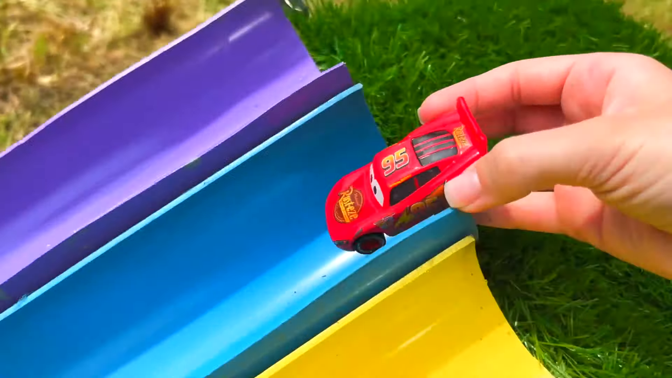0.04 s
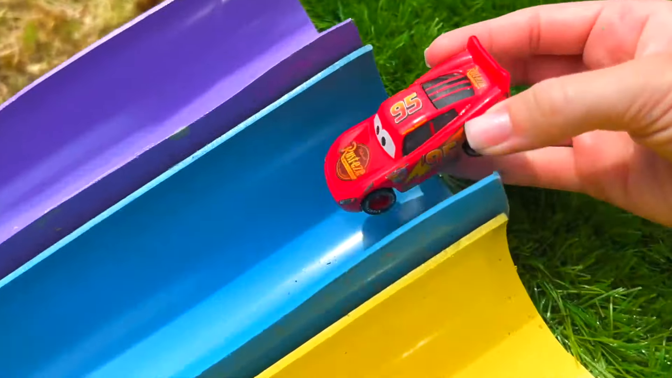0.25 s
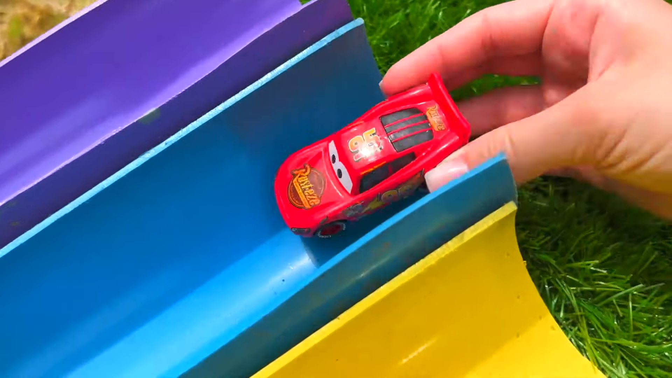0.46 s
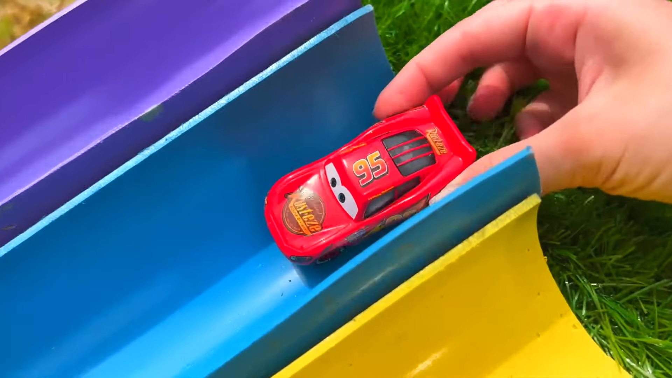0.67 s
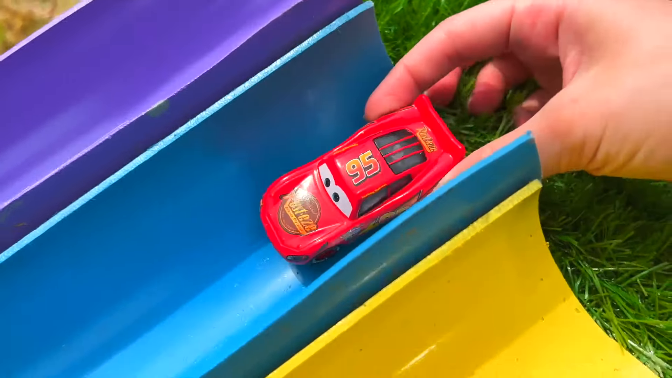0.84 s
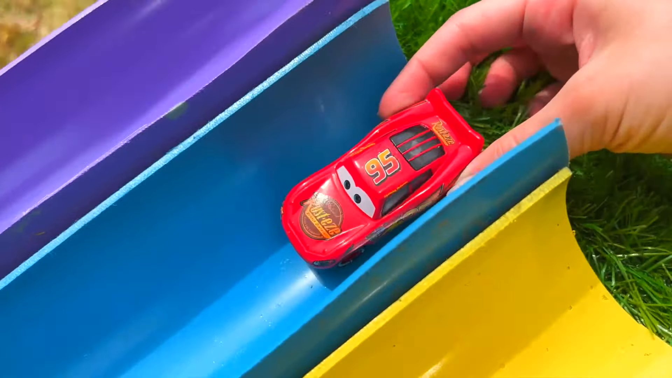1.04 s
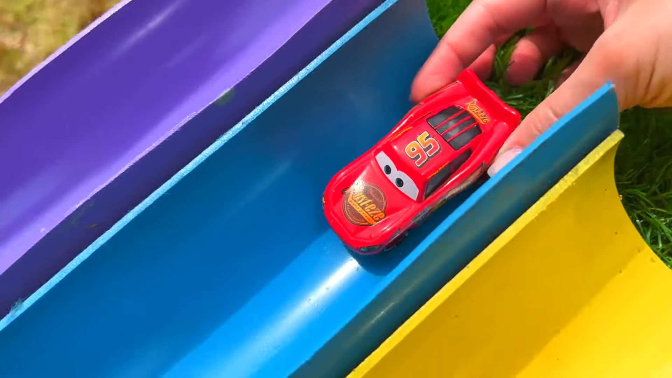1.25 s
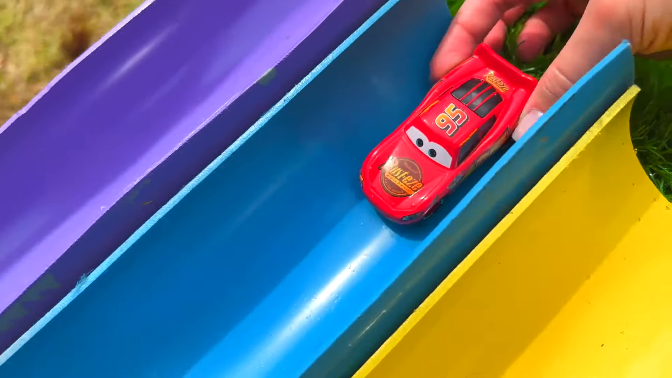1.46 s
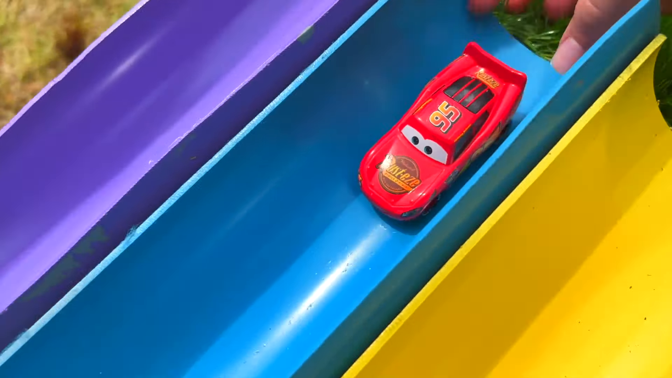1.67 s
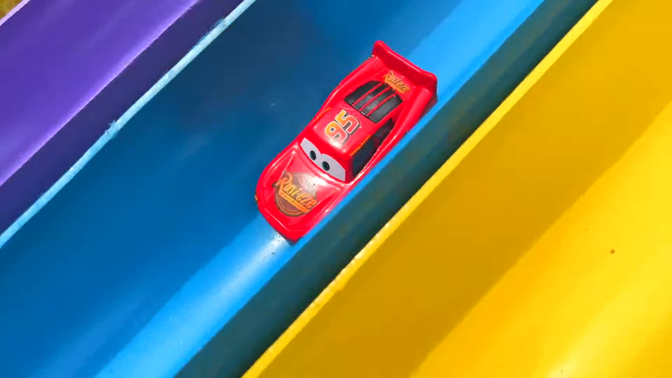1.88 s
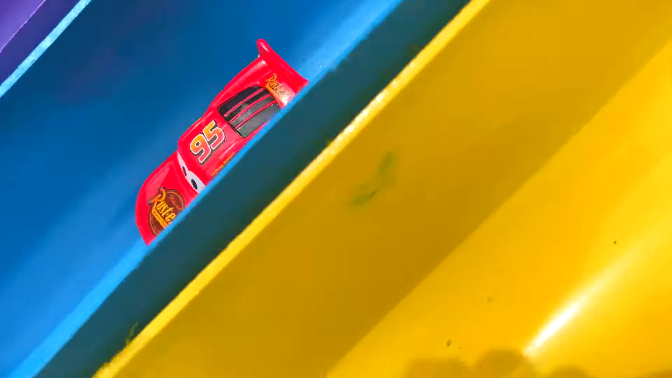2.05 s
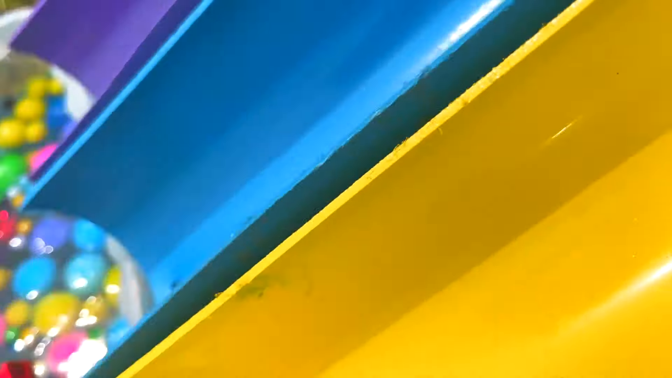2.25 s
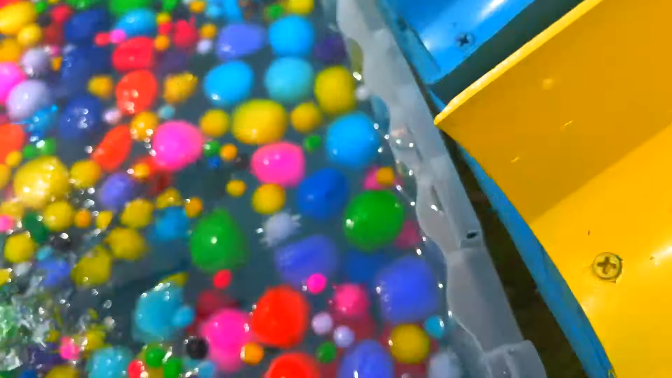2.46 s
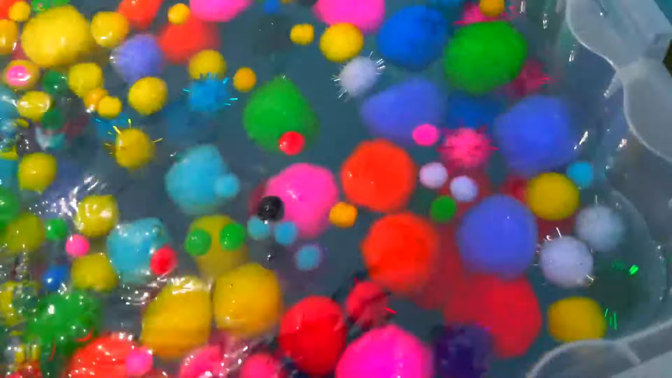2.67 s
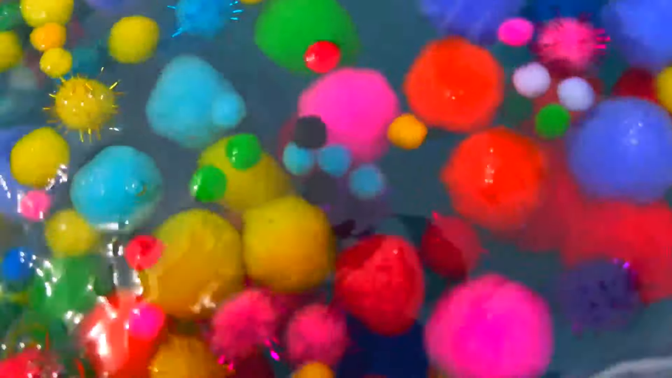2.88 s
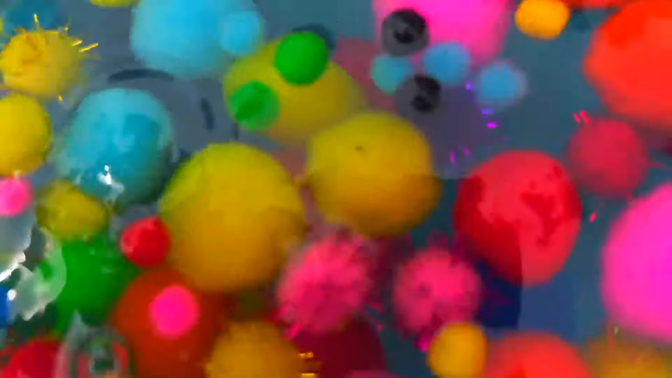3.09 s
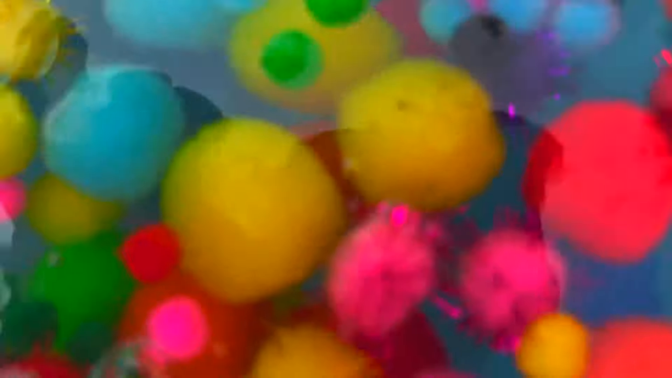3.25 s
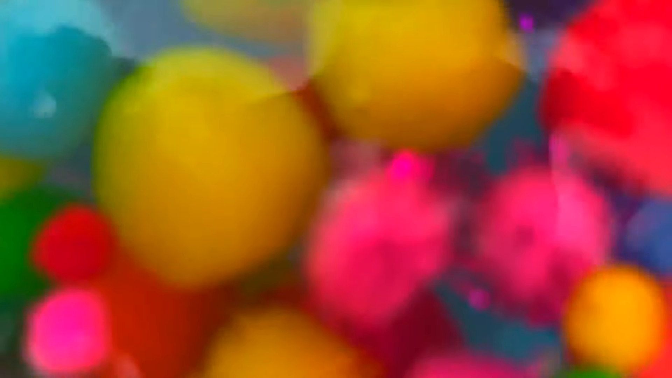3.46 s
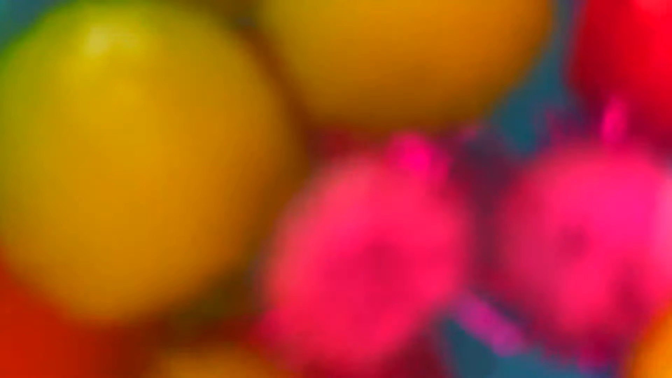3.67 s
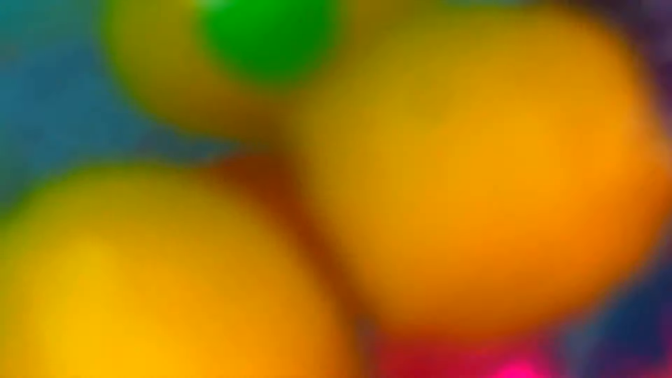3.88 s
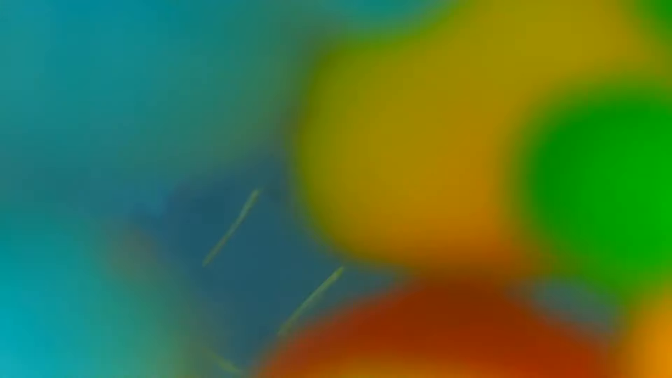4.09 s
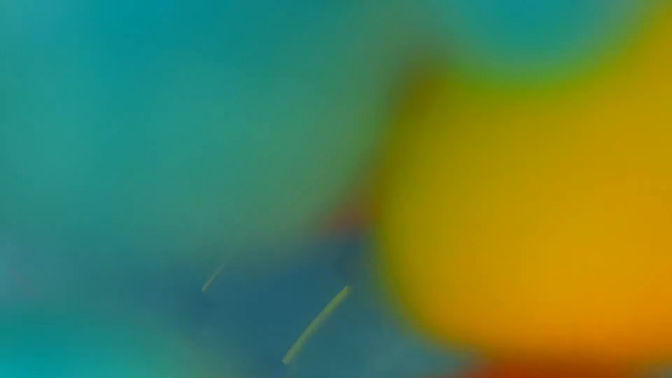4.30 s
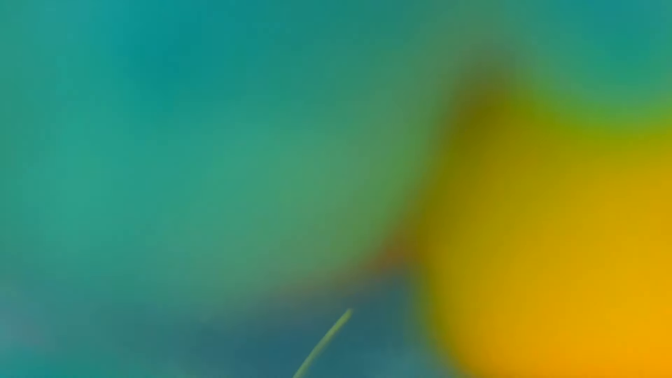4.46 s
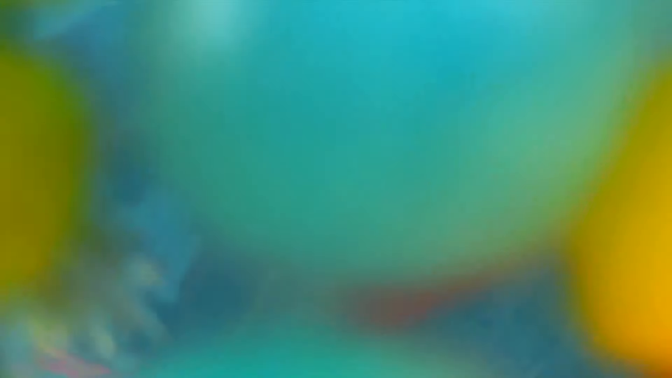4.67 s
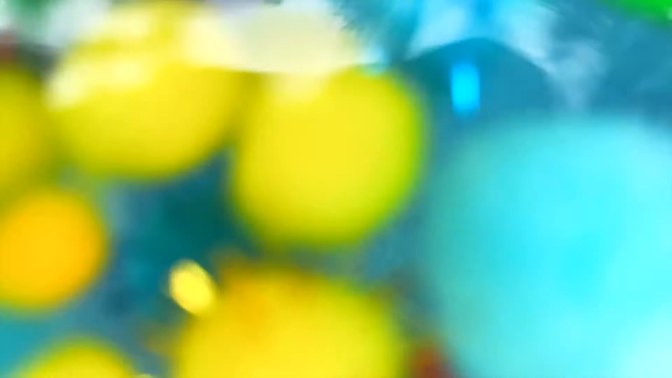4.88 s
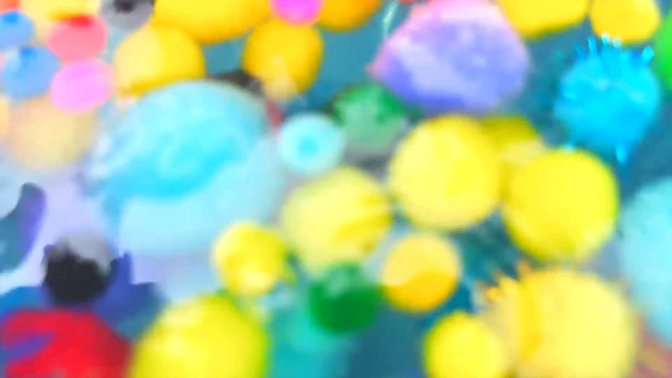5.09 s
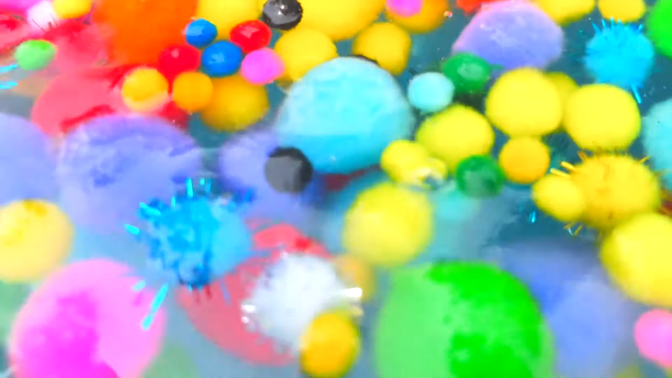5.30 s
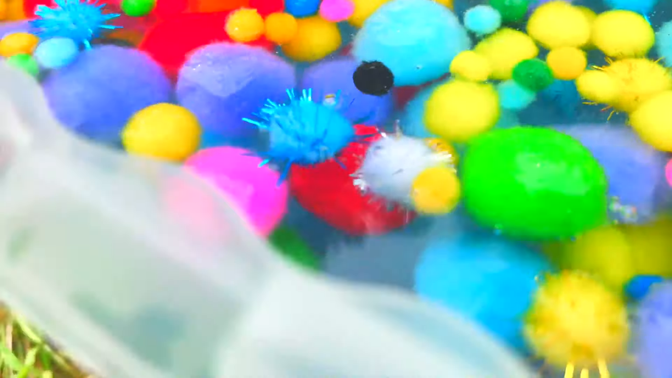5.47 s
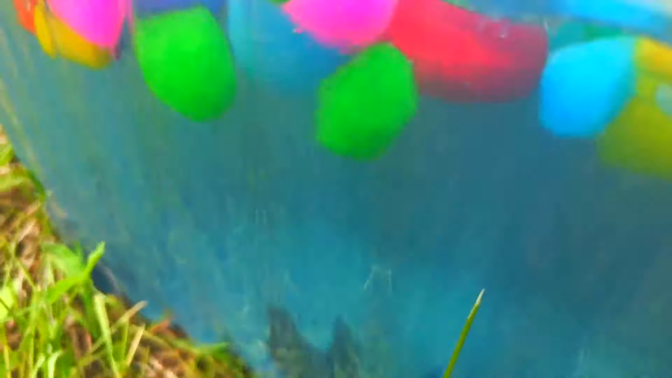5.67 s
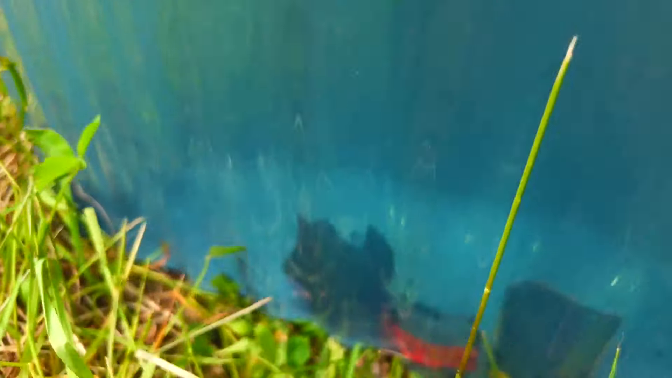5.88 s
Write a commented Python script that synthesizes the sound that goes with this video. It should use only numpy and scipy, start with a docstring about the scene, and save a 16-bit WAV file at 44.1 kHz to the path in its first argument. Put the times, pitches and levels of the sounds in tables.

```python
"""Outdoors, by a plastic gutter that slopes into a tub of water, with a stereo microphone close by.
A hand sets a toy car on the gutter, knocking its modes into a ring; hard wheels chatter down it, louder
with speed. The car splashes in, punching a hole whose notes fall as it deepens. Bubbles glug, the tub
sloshes and foam crackles as its cells burst. Then someone shifts beside the microphone with thuds,
scuffs and dry snaps."""
import sys
import numpy as np
from scipy import signal
from scipy.fft import rfft, irfft
from scipy.io import wavfile
from scipy.ndimage import uniform_filter1d

SR = 44100
rng = np.random.default_rng(int(sys.argv[2]) if len(sys.argv) > 2 else 0)


def master_out(mix):
    """Clip the mix to full scale and print it as 16-bit PCM to the path in sys.argv[1]."""
    frames = np.transpose(np.atleast_2d(mix))
    ceiling = np.clip(frames, -1, 1)
    pcm = np.round(ceiling * 32767).astype(np.int16)
    wavfile.write(sys.argv[1], SR, pcm)


N = 261954

# The gutter's modes. Each row: pitch in Hz, level in dB, t60 in seconds.
GUTTER_MODES = [(623, -9.5, 0.15), (1100, -9, 0.1), (1286, 4, 0.046), (1745, 4.5, 0.024), (1830, 3, 0.031),
                (2237, 10.5, 0.0093), (2850, 6.5, 0.015), (3512, 3.5, 0.016), (4080, 0, 0.028)]
# Colour of wheel chatter and spray treble. Each row: frequency in Hz, level in dB.
CHATTER_TONE = [(180, -53.5), (300, -5), (607, -3), (730, -31), (1250, -5), (1480, -1), (2170, 5.5),
                (2570, 0), (7380, -14.5), (8870, -7.5), (10500, -17), (11600, -15), (15700, -13.5),
                (16500, -50.5)]
LAG_GUTTER, LAG_TUB, LAG_BESIDE = -4, 6, 39  # samples by which the right channel hears each place late


def amp(db):
    return 10 ** (np.asarray(db) / 20)


def unit_rms(x):
    return x / np.sqrt(np.mean(x ** 2) + 1e-20)


def curves(rows):
    """Columns of a time table at every sample."""
    s, *columns = np.transpose(rows)
    return [np.interp(np.arange(N) / SR, s, c) for c in columns]


def level(rows):
    """Gain from rows of seconds and dB, fading to silence at both ends."""
    t = np.arange(N) / SR
    return amp(curves(rows)[0]) * np.clip(np.minimum(t - rows[0][0], rows[-1][0] - t) / .01, 0, 1)


def spells(rows):
    """Gain of spells that rise, hold and fall."""
    t, gain = np.arange(N) / SR, np.zeros(N)
    for s, rise, hold, fall, db in rows:
        up = np.clip(np.minimum((t - s) / rise, (s + rise + hold + fall - t) / fall), 0, 1)
        gain += amp(db - 12.5 * (1 - up)) * np.minimum(up / .3, 1)
    return gain


def on_bins(points):
    hz, value = np.transpose(points)
    return np.interp(np.log(np.fft.rfftfreq(N, 1 / SR) + 1), np.log(hz + 1), value)


def coloured(x, tone):
    return unit_rms(irfft(rfft(x) * amp(on_bins(tone)), N))


def band(x, lo_hz, hi_hz):
    return signal.sosfilt(signal.butter(2, [lo_hz, min(hi_hz, .45 * SR)], "band", fs=SR, output="sos"), x)


def noise(lo_hz, hi_hz):
    return unit_rms(band(rng.standard_normal(N), lo_hz, hi_hz))


def grit(per_s, spread_db, bed):
    """Sparse clicks of uneven size over a bed of noise."""
    size = amp(spread_db * np.minimum(rng.exponential(1, N), 5)) * rng.choice([-1., 1.], N)
    return unit_rms(size * (rng.random(N) < per_s / SR)) + bed * rng.standard_normal(N)


def grains(per_s, spread_db, hz, octaves, cycles):
    """Short rings at 14 pitches around hz, each set off by its own sparse clicks."""
    out = np.zeros(N)
    for f in hz * 2 ** (octaves * np.linspace(-1, 1, 14)):
        t = np.arange(0, 3 * cycles / f, 1 / SR)
        size = amp(spread_db * np.minimum(rng.exponential(1, N), 4))
        clicks = size * (rng.random(N) < per_s / 14 / SR)
        ring = np.sin(2 * np.pi * f * t) * t * np.exp(-2 * t * f / cycles) * f ** 1.8
        out += signal.oaconvolve(clicks, ring)[:N]
    return unit_rms(out)


def crack(lo_hz, hi_hz, t60):
    """A short burst of noise between steep band edges."""
    t = np.arange(2000) / SR
    burst = rng.standard_normal(2000) * amp(-60 * t / t60) * (1 - np.exp(-t / 0.00065))
    burst = band(band(burst, lo_hz, hi_hz), 0.7 * lo_hz, 1.3 * hi_hz)
    return burst / np.max(abs(burst))


def place(mix, s, db, pan_db, sound, lag):
    """Adds a sound at peak level db; pan is left over right, and the right is lag samples late."""
    sound = amp(db) * sound / np.max(abs(sound))
    for side, sign in enumerate((.5, -.5)):
        part = mix[side, round(s * SR) + side * round(lag):][:len(sound)]
        part += amp(sign * pan_db) * sound[:len(part)]


def stereo_pair(x, other):
    """The left channel hears x; the right, a phase-turned copy mixed with unrelated sound."""
    # Each row: frequency in Hz, likeness of the channels from 0 to 1.
    likeness = [(100, 0.92), (600, 0.95), (1400, 0.82), (3000, 0.45), (8000, 1), (15000, 1)]
    # Each row: frequency in Hz, pan in dB.
    balance = [(60, 1), (180, -2.5), (550, -4), (1650, 3.5), (4970, 0.5), (15000, -1.5)]
    # Each row: frequency in Hz, phase lead of the left in radians.
    phase_lead = [(0, -0.5), (1290, 0.62), (4220, -1.7), (4740, -1.1), (5680, -5.5), (7320, -4.5),
                  (8010, -8), (12800, 1.5), (13600, -9.5), (14400, 3), (16700, 24)]
    same, tilt = np.clip(on_bins(likeness), 0, 1), amp(on_bins(balance) / 2)
    right = same * rfft(x) * np.exp(-1j * on_bins(phase_lead)) + np.sqrt(1 - same ** 2) * rfft(other)
    return np.array([irfft(rfft(x) * tilt, N), irfft(right / tilt, N)])


def air():
    """Quiet outdoor hush with faint rustles, unrelated in the two channels."""
    # Each row: frequency in Hz, level in dB.
    hush_tone = [(15, -42), (33, -14), (46, 4.5), (70, -2.5), (124, -25.5), (445, -16), (496, -24),
                 (1640, -24.5), (1980, -28.5), (5720, -30.5), (15200, -53.5), (16500, -66.5)]
    swell = amp(1.1 * noise(1.4, 9.2))
    hush = np.array([coloured(grit(190, 1.8, 1.5), hush_tone) for _ in range(2)])
    return amp(-61) * swell * hush


def rumble():
    """Low lumpy shaking from hand, wheels, slosh and shifting, nearly alike in both channels."""
    # Each row: frequency in Hz, level in dB.
    rumble_tone = [(15, -54), (33, -32.5), (48, 7), (81, 4), (230, 0.5), (609, -13.5), (697, -16.5),
                   (900, -26.5), (1170, -26.5), (1980, -120)]
    # Each row: start, rise, hold and fall in seconds, level in dB.
    shakes = [(0.12, 0.062, 0.61, 0.26, -55.5), (1.53, 0.4, 0.24, 0.088, -37),
              (2.2, 0.025, 0.59, 0.14, -48), (3.9, 0.27, 0.25, 0.37, -62.5)]
    mid, side = (coloured(grit(90, 1.8, 0.66), rumble_tone) for _ in range(2))
    return (amp(-65.5) + spells(shakes)) * np.array([mid + 0.25 * side, mid - 0.25 * side])


def friction(strokes, tone, per_s, bed, lag, width, pan_db):
    """Soft rubbing: dense tiny clicks that swell with each stroke."""
    mid, side = (coloured(grit(per_s, 3.4, bed), tone) for _ in range(2))
    pair = np.array([mid + width * side, np.roll(mid - width * side, lag)])
    return spells(strokes) * pair * amp([[pan_db / 2], [-pan_db / 2]])


def scuffs():
    """Someone brushes past, just left of the microphone."""
    # Each row: start, rise, hold and fall in seconds, level in dB.
    strokes = [(4.16, 0.064, 0.066, 0.036, -53.5), (4.34, 0.058, 0.027, 0.16, -54.5),
               (4.58, 0.11, 0.0038, 0.068, -54), (4.83, 0.048, .08, .04, -66.5),
               (5.03, 0.066, 0.049, 0.038, -74)]
    # Each row: frequency in Hz, level in dB.
    scuff_tone = [(290, -42), (500, 0.5), (959, 0), (1500, 0.5), (1850, 8), (2250, 4), (2650, -1.5),
                  (4200, -17.5), (4800, -4), (5300, -14), (5800, -5), (6650, -10), (7400, -10), (9960, -35),
                  (15600, -53)]
    return friction(strokes, scuff_tone, per_s=3000, bed=1.0, lag=LAG_BESIDE, width=.35, pan_db=2.5)


def scrapes():
    """Tyres and fingers slide on the plastic."""
    # Each row: start, rise, hold and fall in seconds, level in dB.
    strokes = [(0.15, 0.016, 0.24, 0.12, -66.5), (.44, 0.018, 0.051, 0.025, -70),
               (.53, 0.032, 0.028, 0.1, -54.5), (.66, 0.015, 0.03, 0.14, -58.5),
               (.84, 0.0084, 0.039, 0.14, -63.5), (.96, 0.02, 0.041, 0.18, -67.5)]
    # Each row: frequency in Hz, level in dB.
    scrape_tone = [(240, -21), (400, -14), (817, 0), (1670, 0), (2090, -6.5), (8830, -12), (10700, -37),
                   (14000, -23)]
    return friction(strokes, scrape_tone, per_s=1500, bed=0.65, lag=LAG_GUTTER, width=.8, pan_db=0)


def snaps(mix):
    """Dry clicks close by: two hollow notes with a faint ring and a bright crack."""
    # Each row: start in seconds, peak in dB, pitch in Hz, treble peak in dB, pan in dB, lag in samples.
    clicks = [(3.098, -57, 1090, -47, -8, 13), (3.254, -58, 895, -54, -2, 7), (4.035, -50, 944, -66, 0, 40),
              (4.607, -35.5, 1140, -36, -1, 3.5), (4.655, -62, 2550, -45, -6, 1.5),
              (4.687, -48, 2110, -42, 1, 0), (4.875, -49, 1430, -70, -4, 34),
              (5.156, -52.5, 1716, -71.5, -3, 30), (5.365, -42, 1760, -59.5, 3, 34.5),
              (5.751, -58, 1850, -70.5, 2.5, 27), (5.808, -13.5, 1857, -29, 4.5, 39.5)]
    t = np.arange(2000) / SR
    attack = 1 - np.exp(-(t / 0.0015) ** 3)

    def note(hz, t60):
        return np.sin(2 * np.pi * hz * t) * amp(-60 * t / t60) * attack
    for s, db, hz, treble_db, pan_db, lag in clicks:
        body = note(1.03 * hz, .006) + 0.71 * note(0.53 * hz, .006)
        body += 0.015 * note(0.94 * hz, .04) + .04 * note(.25 * hz, .02)
        place(mix, s, db, pan_db, body / body.max() + 0.3 * crack(0.3 * hz, 1.5 * hz, 0.009), lag)
        bright = note(2.05 * hz, .003) + .5 * note(3.27 * hz, .003)
        edge = band(crack(2300, 8000, 0.008), 2000, 8500)
        place(mix, s, treble_db, pan_db, bright / bright.max() + 1.2 * edge, lag)
        # a faint, brief 8 kHz tone is laid over each
        place(mix, s, db - 23, pan_db, note(8090, t60=0.027), lag)


def fizz():
    """Fine foam builds and thins; its cells burst in tiny pings, higher as they get smaller."""
    # Each row: time in seconds, level in dB.
    hiss_levels = [(2.4, -61.5), (2.66, -73.5), (3.0, -68), (3.3, -62.5), (3.5, -63), (4.02, -66.5),
                   (4.6, -72), (5.16, -79), (5.94, -89)]
    # Each row: frequency in Hz, level in dB.
    hiss_tone = [(2500, -43.5), (6000, 11.5), (9500, 12.5), (12000, 10), (15500, 10), (16500, -12)]
    # Each row: time in seconds, centre pitch in Hz, base level in dB.
    cells = [(2.404, 4080, -91), (2.95, 4570, -69), (3.251, 5440, -60.5), (3.999, 8800, -69),
             (5.199, 9070, -90.5)]
    hiss = (coloured(.7 * grit(1200, 4, .7) + grains(500, 4.5, 9500, .75, 5), hiss_tone) for _ in range(2))
    foam = level(hiss_levels) * stereo_pair(*hiss)
    times, pitches, levels = np.transpose(cells)
    t = np.arange(300) / SR
    for when, size, pitch, side in rng.random((500, 4)):
        s = times[0] + when * (times[-1] - times[0])
        hz = min(np.interp(s, times, pitches) * 2 ** (1.3 * (pitch - .5)), .36 * SR)
        ping = np.sin(2 * np.pi * hz * t) * t * np.exp(-t / 0.00014)
        place(foam, s, np.interp(s, times, levels) + 1 + 17 * size ** 1.4, 9 * (side - .5), ping, LAG_TUB)
    return foam


def foam_pops(mix):
    """Larger foam cells burst in narrow cracks, with lesser ones at random among them."""
    # Each row: start in seconds, peak in dB, pitch in Hz, pan in dB.
    large_pops = [(2.338, -40, 9100, 3), (2.3785, -24.5, 7200, 3), (2.4733, -35, 8500, 2),
                  (2.526, -36, 14600, -5), (2.592, -47, 14900, 9), (2.673, -27.5, 11200, 0),
                  (2.754, -42.5, 7250, 1), (2.838, -36, 3460, 4.5), (2.837, -29, 12700, 8),
                  (2.861, -38, 8950, -1), (2.9746, -34, 11260, 2), (3.0267, -29, 12100, -0.5),
                  (3.0447, -41, 14600, 4), (3.141, -43, 5030, 2), (3.289, -52, 6340, -1),
                  (3.343, -29, 12100, -2), (3.406, -34.5, 12400, 0), (3.427, -42, 6200, 2),
                  (3.4972, -24, 8400, -1), (3.825, -47.5, 7800, 0), (3.841, -40, 8940, -1),
                  (3.865, -44.5, 6660, -2), (3.935, -45.5, 8500, 0.5), (4.346, -44.5, 10200, -1),
                  (4.942, -45, 12240, -5)]
    # Each row: time in seconds, peak of the loudest lesser pops in dB.
    crackle_levels = [(2.5, -61), (3.299, -38.5), (4.0, -93), (5.1, -61)]
    times, levels = np.transpose(crackle_levels)
    lesser_pops = []
    for when, softness, pitch, side in rng.random((150, 4)):
        s = times[0] + when * (times[-1] - times[0])
        db = np.interp(s, times, levels) - 12 * softness
        lesser_pops.append((s, db, 5200 * 2 ** (1.1 * pitch ** 2), 24 * (side - .5)))
    for s, db, hz, pan_db in large_pops + lesser_pops:
        pop = crack(0.86 * hz, 1.1 * hz, 0.0024) + 0.1 * crack(6000, 16000, 0.0022)
        place(mix, s, db, pan_db, pop, LAG_TUB)


def slosh():
    """The tub settles in a dense murmur of small gurgles."""
    # Each row: time in seconds, level in dB.
    settling = [(2.39, -33), (2.47, -59), (2.56, -59), (2.65, -60.5), (2.75, -62), (2.9, -65.5),
                (3.2, -60.5), (3.5, -64), (3.7, -113)]
    murmur = (unit_rms(grains(500, 4.6, 1495, 1.774, 8.5) + .5 * noise(229.5, 1700)) for _ in range(2))
    return level(settling) * stereo_pair(*murmur)


def bubble(hz, glide, t60):
    """A pocket of air rings, wobbles and glides in pitch, upward as it nears the surface."""
    t = np.arange(round(0.84 * t60 * SR) + 100) / SR
    wobble = unit_rms(uniform_filter1d(rng.standard_normal((2, 8000)), 160))[:, :len(t)]
    turns = np.cumsum(hz * 2 ** (glide * t + 0.05 * wobble[0])) / SR
    attack = 1 - np.exp(-t / (0.039 * t60))
    decay = amp(1.2 * wobble[1] - 60 * t / t60) * np.cos(np.pi * t / t[-1] / 2)
    return np.sin(2 * np.pi * turns) * attack * decay


def bubbles(mix):
    """Single bubbles glug, the higher ones further left, over a random swarm that dies away."""
    # Each row: start in seconds, peak in dB, pitch in Hz, glide in octaves a second, t60 in seconds.
    glugs = [(2.35, -13, 1335, 6, 0.019), (2.38, -25, 1500, 3, 0.016), (2.408, -24.5, 307, 10.5, 0.21),
             (2.412, -19, 415, -8, 0.017), (2.426, -22.5, 244.3, 2.5, 0.15), (2.44, -46, 390, 3, 0.077),
             (2.4815, -15, 313, 5, 0.061), (2.481, -15, 494, 6, 0.013), (2.513, -35, 1050, 34, 0.084),
             (2.551, -30, 995, 18, 0.02), (2.565, -48.5, 1990, 19, 0.036), (2.57, -41, 865, 2, .03),
             (2.683, -40, 2100, 3, 0.011), (2.676, -53, 380, -4, 0.087), (2.737, -35, 930, 3, 0.012),
             (2.772, -45, 1280, 0, 0.02), (2.786, -46, 1780, 5, 0.018), (2.672, -53, 2360, 2, 0.013),
             (2.945, -50, 1065, 0, 0.032), (3.043, -54, 1850, 2, 0.017), (3.153, -46.5, 2950, 5, 0.0086),
             (2.817, -40, 714, 5, 0.031), (2.884, -46, 1700, 5, 0.029), (2.916, -44.5, 783, 15, 0.045),
             (2.915, -45.5, 1720, 7, 0.052), (2.943, -43, 2870, 3, 0.013), (2.985, -44, 329, 6, 0.2),
             (3.038, -51, 446, 14.5, 0.14), (3.1, -33.5, 1010, 6, 0.011), (3.135, -55, 1045, 12.5, 0.056),
             (3.252, -46.5, 890, -6.5, 0.048), (3.338, -54, 913, 1, 0.06), (3.759, -57, 862, 14, 0.033)]
    # Each row: time in seconds, peak of the swarm's loudest bubbles in dB.
    swarm_levels = [(2.42, -33), (2.55, -42), (2.901, -48), (3.7, -85)]
    for s, db, hz, glide, t60 in glugs:
        place(mix, s, db, 3.5 * np.log2(hz / 400), bubble(hz, glide, t60), LAG_TUB)
    times, levels = np.transpose(swarm_levels)
    for when, softness, pitch, side in rng.random((200, 4)):
        s = times[0] + when * (times[-1] - times[0])
        hz = 240 * 2 ** (2.8 * pitch ** 1.6)
        db = np.interp(s, times, levels) - 12 * softness
        place(mix, s, db, 6 * (side - .5), bubble(hz, glide=3, t60=15 / hz), LAG_TUB)


def thuds(mix):
    """Bending waves in plastic or ground: highs arrive first, so blows and presses sweep down."""
    # Dull blows. Each row: start in seconds, peak in dB, final pitch in Hz, t60 in seconds.
    blows = [(0.174, -44.5, 125, 0.19), (0.206, -32.5, 150.2, 0.36), (0.298, -35.5, 136.3, 0.16),
             (0.349, -32.5, 157.5, 0.19), (0.556, -42.5, 156, 0.35), (2.378, -32.5, 171, 0.21),
             (2.494, -30, 75.5, 0.16), (2.55, -26.5, 195, 0.054), (2.618, -44, 186, 0.29),
             (2.674, -31.5, 184, 0.058), (2.7, -37, 76, 0.47), (2.744, -35, 178, 0.072),
             (4.027, -37.5, 69.6, 0.17), (4.079, -45, 88.4, 0.052), (4.156, -23.5, 86.9, 0.1),
             (4.697, -39, 73.5, 0.28)]
    # The hand pushes softly on the gutter. Rows as for the blows.
    presses = [(0.212, -32, 84, 0.096), (0.352, -29.5, 94, 0.073), (0.465, -43, 112, 0.079),
               (0.588, -35, 88, 0.11), (0.645, -32, 69.4, 0.11), (0.668, -30.5, 118, 0.11),
               (0.718, -33.5, 69.4, 0.15), (0.789, -40.5, 68, 0.17), (0.83, -31, 75, 0.12),
               (0.885, -35.5, 62, 0.13), (0.92, -44.5, 66.5, 0.36), (1.065, -43, 52.7, 0.15),
               (1.285, -53, 63.1, 0.24)]
    # The wheels thump it turn by turn, each at a steady pitch. Rows as for the blows.
    bumps = [(1.568, -51.5, 185, 0.12), (1.63, -43, 188, .1), (1.68, -39, 174, 0.048), (1.72, -34, 185, .1),
             (1.762, -36, 201, 0.11), (1.812, -30.5, 193, 0.074), (1.862, -43, 77, 0.13),
             (1.955, -33.5, 75.7, 0.45), (2.105, -30.5, 84.4, 0.13), (2.15, -29.5, 89, 0.12)]
    t = np.arange(9000) / SR
    for rows, start_ratio, rise_s in ((blows, 4.1, 0.0021), (presses, 3.15, 0.0046), (bumps, 1, .01)):
        for s, db, hz, t60 in rows:
            turns = np.cumsum(hz * (1 + (start_ratio - 1) * np.exp(-t / 0.00364))) / SR
            thud = np.sin(2 * np.pi * turns) * amp(-60 * t / t60) * (1 - np.exp(-t / rise_s))
            if s < 2.3:
                place(mix, s, db, -1.5, thud, LAG_GUTTER)
            elif s < 3.9:
                place(mix, s, db, -2, thud, LAG_TUB / 2)
            else:
                place(mix, s, db, 5, thud, LAG_BESIDE / 2)


def gutter_ring(drive, shares_db):
    """The gutter's modes answer a drive; each mode's share is steady or changes in time."""
    t = np.arange(3000) / SR
    rings = (amp(db - 60 * t / t60) * np.sin(2 * np.pi * hz * t) for hz, db, t60 in GUTTER_MODES)
    return unit_rms(sum(signal.oaconvolve(amp(share) * drive, ring)[:len(drive)]
                        for ring, share in zip(rings, shares_db)))


def knocks(mix):
    """The car is set down: hollow contacts ring the gutter, and its metal adds a bright tick."""
    # Each row: start in seconds, peak in dB, pitch in Hz, tick peak in dB, tick pitch in Hz, pan in dB.
    contacts = [(0.13, -51, 1310, -38.5, 6750, -2), (0.17, -45, 805, -65, 7320, -4),
                (0.206, -38, 760, -43, 6000, 11), (0.214, -34.5, 714, -32.5, 6050, 4),
                (0.275, -51, 800, -68, 4170, -1), (0.3, -50, 710, -64, 4670, 1),
                (0.349, -22, 655, -10, 4820, 5), (0.355, -37, 1750, -51, 4120, -2),
                (0.483, -39, 1400, -37.5, 5900, 5.5), (0.521, -50, 1440, -44, 4470, 3),
                (0.56, -34.5, 1370, -40, 5130, 5), (0.569, -34, 1850, -21.5, 6100, 0),
                (0.577, -35.5, 2100, -29.5, 4640, 1.5), (0.584, -42, 1490, -44, 7000, 4),
                (0.661, -39, 1370, -39.5, 5340, 11.5), (0.664, -36, 1940, -50, 5000, -3),
                (0.687, -31, 850, -50, 4000, 1), (0.6862, -27.5, 2560, -23.5, 5800, 6),
                (0.689, -28, 1370, -31, 3980, 3), (0.692, -20.5, 1890, -26, 5530, 6.5),
                (0.7, -32, 1830, -24, 7350, 0), (0.708, -30.5, 1750, -29.5, 8500, 1),
                (0.889, -47, 1920, -59, 4510, 0)]
    t, mode_hz = np.arange(2000) / SR, np.transpose(GUTTER_MODES)[0]
    t60, set_down_s = 0.019, .4
    for s, db, hz, tick_db, tick_hz, pan_db in contacts:
        note = np.sin(2 * np.pi * hz * t) * amp(-60 * t / t60) * (1 - np.exp(-t / 0.00029))
        contact = note / note.max() + 1.65 * crack(0.51 * hz, 4.5 * hz, t60)
        ring = gutter_ring(contact, -15 * abs(np.log2(mode_hz / hz)))  # favours modes near the pitch
        coupling = 0.94 if s > set_down_s else 0.23  # stronger once the car rests on the gutter
        place(mix, s, db, pan_db, unit_rms(contact) + coupling * ring, LAG_GUTTER)
        tick = np.sin(2 * np.pi * tick_hz * t) * t * np.exp(-t / 0.00028)
        place(mix, s, tick_db, pan_db, tick / tick.max() + 0.2 * crack(3000, 22000, 0.013), LAG_GUTTER)


def jolts(mix):
    """The rolling car bounces; each landing rings a random blend of the gutter's modes."""
    # Each row: start in seconds, peak in dB.
    bounces = [(1.9892, -11.5), (2.0121, -9), (2.035, -14.5), (2.066, -3), (2.0794, -18), (2.101, -13.5),
               (2.1218, -13.5), (2.1634, -9.5), (2.2133, -10), (2.2275, -12)]
    for s, db in bounces:
        contact = crack(1100, 9500, .025)
        ring = gutter_ring(contact, 7.4 * rng.standard_normal(len(GUTTER_MODES)))
        place(mix, s, db, 1.5, unit_rms(contact) + 0.27 * ring, lag=-3)


def rolling():
    """Hard wheels chatter over grit and ring the gutter, brightening as they pass from right to left."""
    # The run grows louder with speed. Each row: time in seconds, level in dB.
    run = [(1.542, -63), (1.619, -55.5), (1.744, -37.5), (1.895, -29), (2.034, -25.5), (2.224, -21.5),
           (2.267, -52.5)]
    t, span_s = np.arange(N) / SR, [run[0][0], run[-1][0]]
    treble_db, pan_db = np.interp(t, span_s, (-11, -0.5)), np.interp(t, span_s, (-3, 3.5))
    throb, shiver = (amp(1.7 * np.clip(noise(22, 290), -2, 2)) for _ in range(2))
    # each mode swells and fades as the wheels move on
    swing_db = [2.5 * np.clip(noise(1.4, 21), -2, 1.5) for _ in GUTTER_MODES]

    def wheels():
        drive = throb * (grit(4000, 1.7, 0.6) + 0.42 * grains(900, 1.9, 2020, 1.3, 3.15))
        chatter = unit_rms(band(coloured(drive, CHATTER_TONE), 220, 2900))
        mids = unit_rms(chatter + 1.8 * gutter_ring(drive, swing_db))
        hiss = throb ** .8 * shiver ** .6 * coloured(grit(5000, 0.9, 0.7), CHATTER_TONE)
        return mids + amp(treble_db) * unit_rms(band(hiss, 4200, 11000))
    return level(run) * stereo_pair(wheels(), wheels()) * amp(np.outer([.5, -.5], pan_db))


def slaps(mix):
    """Sheets of water slap down in wide wet bursts."""
    # Each row: start in seconds, peak in dB, pitch in Hz, treble against the peak in dB, t60 in seconds.
    sheets = [(2.242, -8, 2300, -2.5, 0.0077), (2.311, -18.5, 2130, -15, 0.025),
              (2.347, -13.5, 1290, -24, 0.063), (2.3781, -14, 1900, -4, 0.01),
              (2.398, -29, 3000, -25.5, 0.0072), (2.4727, -28.5, 2200, -21, 0.01),
              (2.4767, -24, 1450, -20, 0.0068), (2.487, -32.5, 1780, -6, 0.036),
              (2.62, -48, 1100, -10, .02), (2.662, -48, 2200, -9, 0.017), (2.672, -38, 1760, 7, 0.011),
              (2.737, -43, 1170, -2, 0.018), (2.772, -44.5, 1600, -9, 0.018),
              (2.857, -48, 1000, -10, 0.025), (2.943, -53, 2000, -10, 0.011),
              (2.996, -46, 1300, -10, 0.026)]
    for s, db, hz, treble_db, t60 in sheets:
        place(mix, s, db, 3, crack(.5 * hz, 2.4 * hz, t60), LAG_TUB - 2)
        place(mix, s, db + treble_db, 0, crack(3800, 21000, 0.13 * t60), LAG_TUB - 2)


def splash():
    """Clumps of spray, and the hole the car punches, sounding as a closed pipe that deepens."""
    # Each row: time in seconds, spray level in dB, the hole's lower and upper notes against it in dB.
    splash_levels = [(2.24, -27.5, -11, -15), (2.262, -40, -10.5, -13.5), (2.277, -32, 10.5, -14),
                     (2.297, -33.5, 2.5, -16.5), (2.32, -37.5, 3.5, 3.5), (2.338, -36.5, 4.5, 10.5),
                     (2.352, -36, -9.5, 13), (2.36, -42, 2.5, -2.5), (2.39, -41.5, 7, -1.5),
                     (2.41, -62.5, 7.5, -2.5), (2.46, -96, 0.5, 0)]
    lower_db, upper_db = curves(splash_levels)[1:]
    sink_start_s, start_depth_m, sink_m_per_s, sound_m_per_s = 2.272, .042, 1.45, 343
    depth_m = start_depth_m + sink_m_per_s * np.maximum(np.arange(N) / SR - sink_start_s, 0)
    phase = 2 * np.pi * np.cumsum(sound_m_per_s / (4 * depth_m)) / SR  # quarter-wave resonance
    clumps = amp(2.5 * noise(21, 200))

    def hole_note(drive, multiple, width_hz):
        carrier, pole = np.exp(1j * multiple * phase), np.exp(-np.pi * width_hz / SR)
        envelope = signal.lfilter([(1 - pole) ** 3], np.poly([pole] * 3), drive / carrier)
        envelope = envelope / np.std(envelope) + .4 * clumps  # the added part keeps the note unbroken
        return unit_rms((carrier * envelope).real)

    def spray():
        drive = clumps * grit(4000, 1.2, 0.52)
        hole = amp(lower_db) * hole_note(drive, 1, 400) + amp(upper_db) * hole_note(drive, 2.2, 730)
        mids = unit_rms(band(band(drive, 1200, 4400), 1000, 7100))
        treble = unit_rms(band(coloured(drive, CHATTER_TONE), 3500, 21000))
        return hole + mids + amp(6.5) * treble
    return level(splash_levels) * stereo_pair(spray(), spray())


def scene():
    """All sources at the microphone; tub, plastic and ground briefly echo the short sounds."""
    beds = rumble() + rolling() + splash() + slosh() + fizz() + scrapes() + scuffs() + air()
    water, solids = np.zeros((2, 2, N))
    for source in (slaps, bubbles, foam_pops):
        source(water)
    for source in (knocks, jolts, thuds, snaps):
        source(solids)
    t = np.arange(3000) / SR
    reflections = band(rng.standard_normal((2, 3000)), 800, 6200) * amp(-60 * t / 0.02) * (t > .002)
    reflections /= np.linalg.norm(reflections[0])
    echo = signal.fftconvolve(amp(-9) * water + amp(-17) * solids, reflections, axes=1)[:, :N]
    return beds + water + solids + echo


def record(dry):
    """A steep low-pass at 16.6 kHz."""
    return signal.oaconvolve(dry, signal.firwin(511, 16600, window=("kaiser", 9), fs=SR)[None], "same")


dry = scene()
out = record(dry)
master_out(out)
```